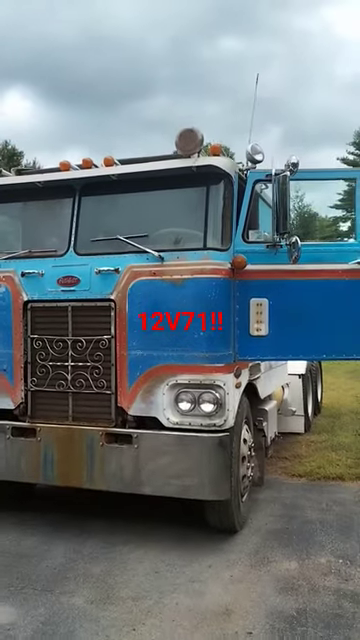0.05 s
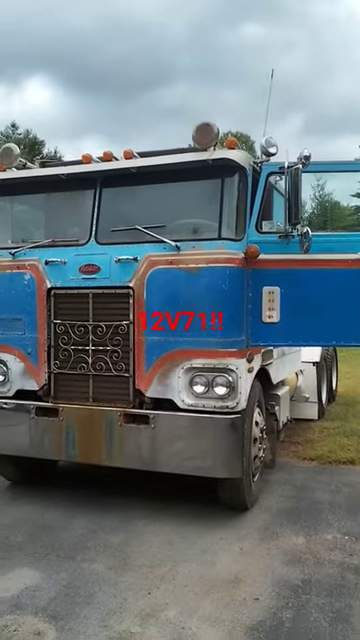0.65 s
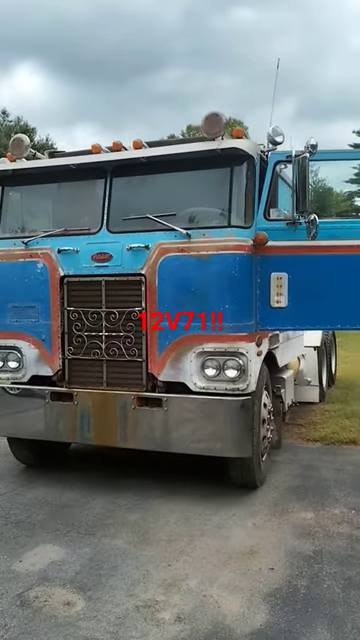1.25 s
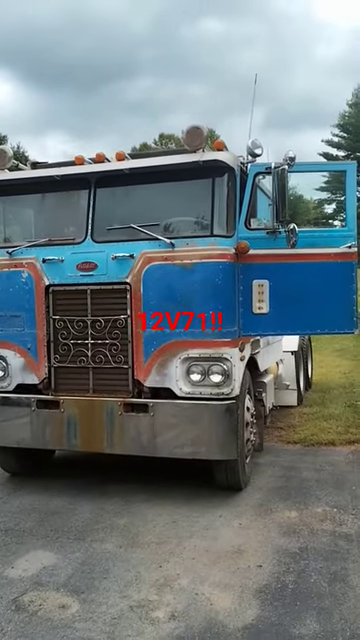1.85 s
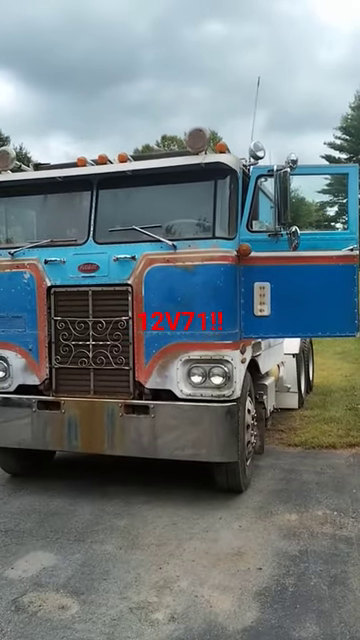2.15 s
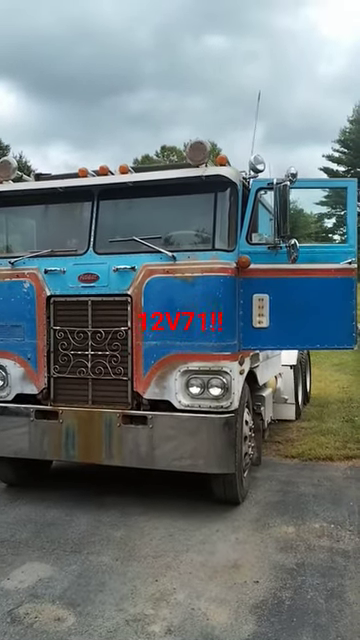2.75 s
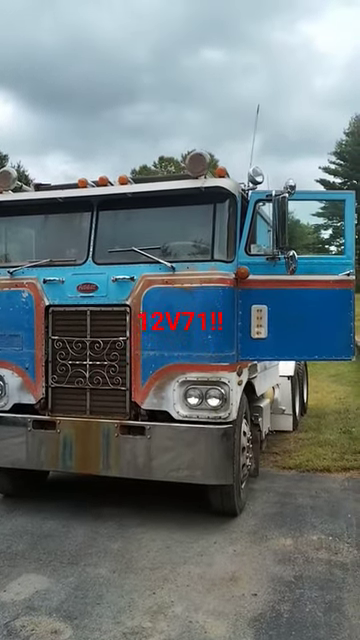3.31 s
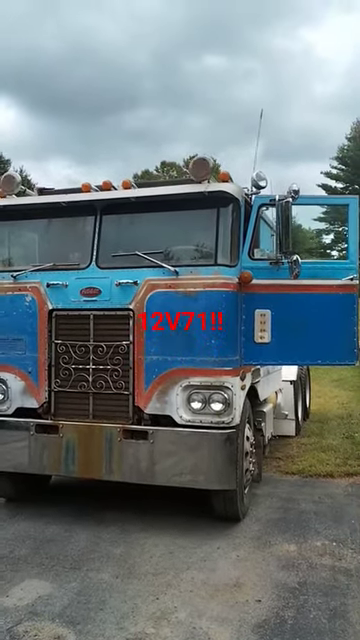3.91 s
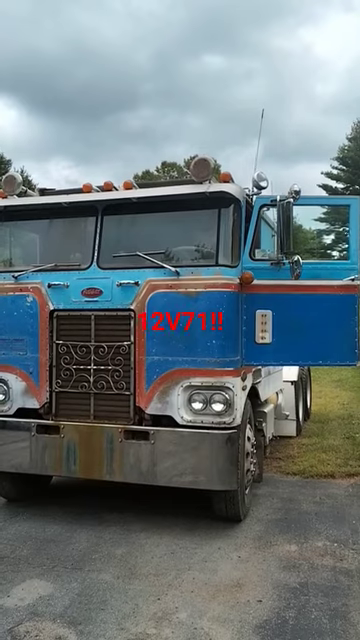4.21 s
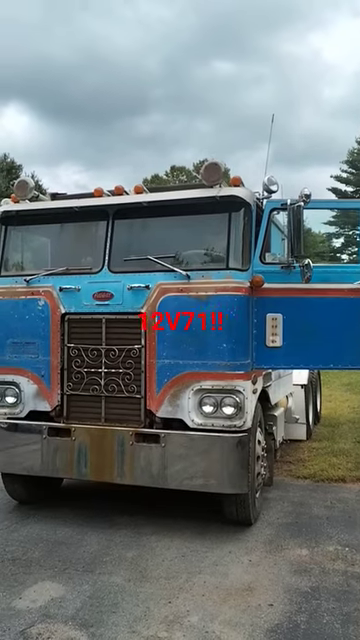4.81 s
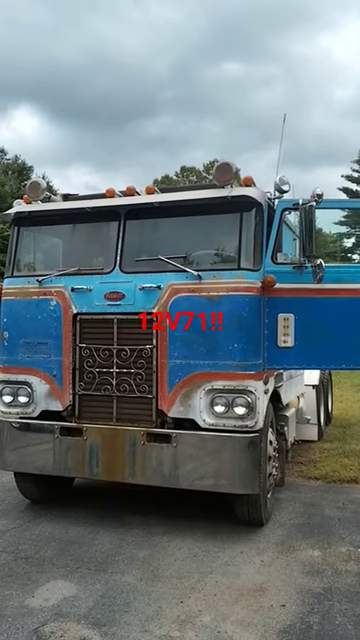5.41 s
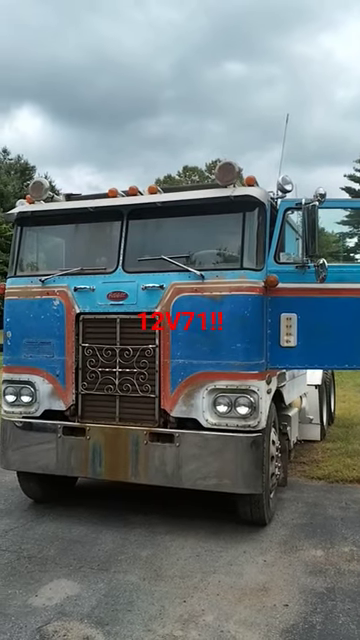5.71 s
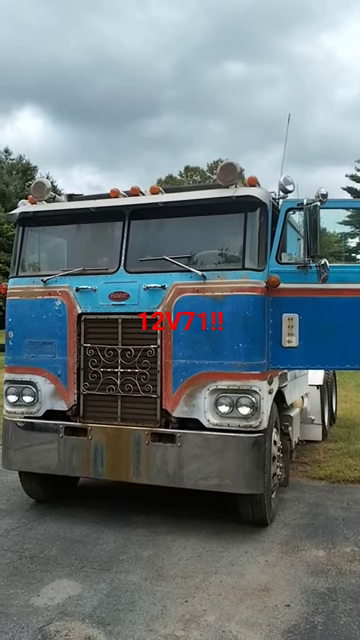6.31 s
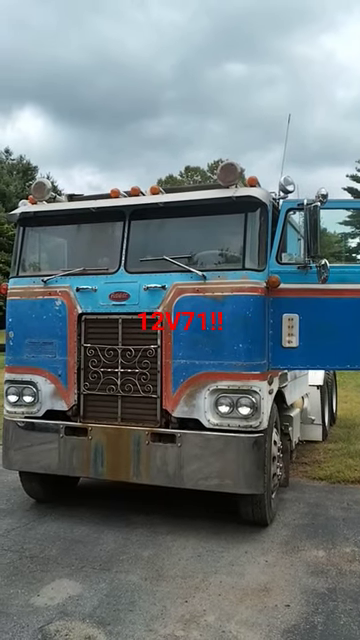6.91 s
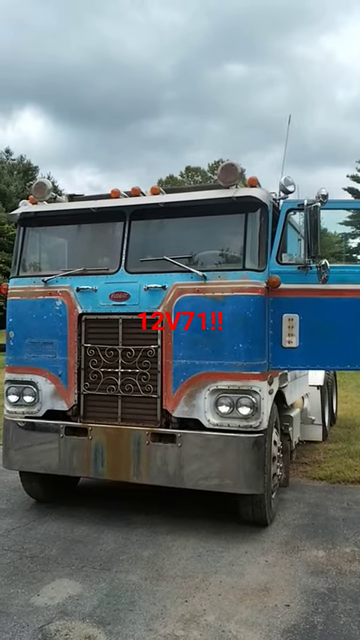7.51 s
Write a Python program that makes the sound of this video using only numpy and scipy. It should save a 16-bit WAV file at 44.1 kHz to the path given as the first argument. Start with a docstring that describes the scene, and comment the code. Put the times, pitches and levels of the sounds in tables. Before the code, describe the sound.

Insects chirp and grit crunches underfoot, then a faint buzzer drones and a diesel truck's starter clanks and cranks without catching.

```python
"""Cold diesel cranking in a country yard

Insects chirp with their wings, grit snaps underfoot and clothing swishes. The key is turned and a buzzer
drones in the cab of an old twelve-cylinder truck. The solenoid clacks, the pinion slams into the
ring gear, and the starter turns the engine over, whining, clattering and chuffing as it gains speed."""
import sys
import numpy as np
from scipy import signal
from scipy.fft import rfft, irfft
from scipy.io import wavfile
from scipy.ndimage import uniform_filter1d

SR = 44100
rng = np.random.default_rng(int(sys.argv[2]) if len(sys.argv) > 2 else 0)


def store_wav(level_fs):
    """Save 16-bit WAV to argv[1]."""
    pcm = np.round(np.clip(np.atleast_2d(level_fs), -1, 1) * 32767)
    wavfile.write(sys.argv[1], SR, pcm.T.astype(np.int16))


N = 332955
T = np.arange(N) / SR
STARTER_ON_S = 6.37
LABOUR_HZ, FREE_HZ, FULL_HZ = 186.84, 235, 259.9  # starter speeds, in gear teeth per second


def undb(db):
    """Decibels to gain."""
    return 10 ** (np.asarray(db) / 20)


def unit(x):
    """Scale to rms 1."""
    return x / np.sqrt(np.mean(x ** 2))


def noise():
    """White noise."""
    return rng.standard_normal(N)


def band(x, hz, width_hz):
    """One resonance, gain 1 at its centre."""
    return signal.lfilter(*signal.iirpeak(min(hz, SR / 2 - 1), hz / width_hz, SR), x)


def colour(x, points):
    """Causal EQ shaped by (Hz, dB) points; white noise keeps its level."""
    hz, db = np.transpose(points)
    log_hz = np.log(np.fft.rfftfreq(4096, 1 / SR) + 1)
    cepstrum = irfft(np.log(undb(np.interp(log_hz, np.log(hz), db))))
    half = len(cepstrum) // 2
    cepstrum[1:half] *= 2
    cepstrum[half + 1:] = 0
    response = irfft(np.exp(rfft(cepstrum)))
    return signal.fftconvolve(x, response / np.linalg.norm(response))[:N]


def drift(rate):
    """Smooth random motion of rms 1, turning rate times a second."""
    k = max(int(SR / rate), 1)
    return unit(uniform_filter1d(np.repeat(noise()[:N // k + 1], k), k)[:N])


def fade(start, decay_s, rise_s=0.00041):
    """Quick attack, exponential decay."""
    age = np.maximum(T - start, 0)
    return np.minimum(age / rise_s, 1) * np.exp(-np.minimum(age / decay_s, 40))


def ramp(start, seconds):
    """Go from off to on."""
    return np.clip((T - start) / seconds, 0, 1)


def ring(x, modes):
    """Strike a set of (Hz, dB, t60) modes; white noise keeps its level."""
    t = T[:SR // 2]
    response = sum(undb(db - 60 * t / t60) * np.sin(2 * np.pi * (hz * t + rng.random()))
                   for hz, db, t60 in modes)
    return signal.fftconvolve(x, response / np.linalg.norm(response))[:N]


def engine(teeth_per_stroke=11, sag=.014, wobble=.013, swell_db=0.9):
    """The starter cranks the engine; each compression slows it and loads the gears."""
    tooth_hz = tooth_rate()
    strokes = np.cumsum(tooth_hz) / SR / teeth_per_stroke
    squeeze = np.cos(2 * np.pi * strokes)
    teeth = np.cumsum(tooth_hz * (1 - sag * squeeze + wobble * drift(30))) / SR
    load = undb(swell_db * squeeze + 0.96 * drift(40))
    # with speed, the chuffing recedes and the whine grows
    speeds = (LABOUR_HZ, FULL_HZ)
    metal = undb(np.interp(tooth_hz, speeds, (-43, -41.5))) * gear_clatter(teeth, load)
    whine = undb(np.interp(tooth_hz, speeds, (-49.5, -44.7))) * starter_whine(teeth, tooth_hz)
    chuff = undb(np.interp(tooth_hz, speeds, (-45, -52.5))) * cylinder_chuff(strokes)
    return ramp(STARTER_ON_S, 0.011) * (metal + whine + chuff)


def tooth_rate(breaks_free_s=6.705, surge_s=.125, creep_s=.45):
    """The starter labours in cold oil, breaks free, then creeps towards full speed."""
    surge = ramp(breaks_free_s, surge_s)
    creep = 1 - np.exp(-np.maximum(T - breaks_free_s - surge_s, 0) / creep_s)
    return LABOUR_HZ + (FREE_HZ - LABOUR_HZ) * surge + (FULL_HZ - FREE_HZ) * creep


def gear_clatter(teeth, load, scatter_db=4, slide_db=-2, housing_db=-4, clatter_db=-1.95, sing_db=-7):
    """Each tooth lands with its own force and slides, ringing the bell housing and the block."""
    # Bell housing modes. Each row: pitch in Hz, width in Hz, relative level in dB.
    housing_modes = [(357, 25, -3), (578, 34, 3.5), (688, 28, 3.5), (723, 26, 3), (988, 25, 2),
                     (1125, 29, -1), (1203, 24, -2.5), (1375, 26, 2), (1606, 84, -1.5), (2192, 37, -3),
                     (2290, 84, -3.5), (2496, 60, -4.5), (2790, 79, -8), (2960, 84, -12)]
    # Tone of the block. Each row: frequency in Hz, relative level in dB.
    block_eq = [(71, -41), (120, -13), (180, -8.5), (243, -7.5), (428, -12.5), (725, -5), (869, -8.5),
                (1000, -8), (2430, -17), (3230, -28), (4550, -17), (6820, -34.5), (7860, -32.5),
                (9620, -55), (15000, -38)]
    impacts = np.diff(np.floor(teeth), prepend=0) * undb(scatter_db * noise())
    sliding = unit(noise() * np.exp(-(teeth % 1) / 2.3))
    mesh = load * (unit(impacts) + undb(slide_db) * sliding)
    housing = sum((-1) ** k * undb(db) * band(mesh, hz, width)
                  for k, (hz, width, db) in enumerate(housing_modes))
    # injectors and timing gears chatter, about 1400 ticks a second
    ticks = (rng.random(N) < 1400 / SR) * noise()
    clatter = colour(load * (sliding + .55 * unit(ticks)), block_eq)
    # worn gears sing in overtones that come and go
    overtones = sum(undb(4.2 * drift(30)) * np.sin(2 * np.pi * k * teeth) for k in range(4, 26))
    sing = colour(overtones, block_eq)
    return undb(housing_db) * unit(housing) + undb(clatter_db) * unit(clatter) + undb(sing_db) * unit(sing)


def starter_whine(teeth, tooth_hz, waver_db=2.5, strain_db=-7):
    """The mesh tone: under strain its fundamental thins and harmonics 2 and 3 come forward."""
    strain = np.clip((245 - tooth_hz) / 60, 0, 1)
    overtones = sum(undb(2.6 * drift(30)) * np.sin(2 * np.pi * k * teeth + .45 * drift(60))
                    for k in (2, 3))
    fundamental = undb(waver_db * drift(14) + strain_db * strain) * np.sin(2 * np.pi * teeth)
    return fundamental + (0.04 + .5 * strain) * overtones


def cylinder_chuff(strokes):
    """Air leaves the cylinders in low, uneven puffs, one per stroke."""
    puffs = np.exp(-(strokes % 1) / .5) * (1 + 30 * noise())
    return unit(band(band(puffs, 56, 33), 53, 70) + 0.5 * band(band(puffs, 95, 16), 95, 60))


def pinion(solenoid_s=6.3155, solenoid_db=-38, ring_db=-9.5, thud_db=-32, thud_hz=93):
    """The solenoid clacks, the pinion bounces into mesh, the ring gear rings and the frame thuds."""
    # Tone of the starter's struck steel. Each row: frequency in Hz, relative level in dB.
    steel_eq = [(59, -18), (100, -2.5), (462, -21), (594, -9.5), (923, -13.5), (1290, -16.5), (1530, -11.5),
                (1960, -18.5), (2270, -5.5), (3180, -20.5), (4730, 1.5), (6620, -26.5), (7200, -23),
                (11000, -38), (15000, -35)]
    # Pinion hits. Each row: start in seconds, level in dB, decay in seconds.
    slams = [(6.356, -40, 0.015), (6.3645, -26.5, 0.012), (6.3681, -11.5, 0.00081),
             (6.3743, -15.5, 0.00099), (6.377, -25.5, 0.013), (6.408, -33.5, 0.022), (6.46, -48, .07)]
    # Ring gear modes. Each row: pitch in Hz, relative level in dB, seconds to fall 60 dB.
    gear_modes = [(4242, -6, .28), (4356, -7, .2), (4408, -4, .28), (4513, -4, .25), (4570, 0, .3),
                  (4684, -6, .2), (4786, -4, .25), (4897, -1, .3), (5048, -3, .28), (5160, -8, .2),
                  (5284, -6, .28), (5470, -10, .2), (5650, -12, .2)]
    clack = colour(noise() * fade(solenoid_s, 0.035, rise_s=0.0018), steel_eq)
    solenoid = 0.46 * clack + band(clack, 2100, 1800) + band(clack, 800, 970) + band(clack, 10000, 5000)
    blows = noise() * sum(undb(db) * fade(s, decay, rise_s=decay / 8) for s, db, decay in slams)
    clang = colour(blows, steel_eq) + undb(ring_db) * ring(blows, gear_modes)
    thud = np.sin(2 * np.pi * thud_hz * (T - STARTER_ON_S))
    thud *= fade(STARTER_ON_S + 0.015, 0.041, rise_s=0.023)
    return undb(solenoid_db) * solenoid + clang + undb(thud_db) * thud


def buzzer(on_s=3.8, pitch_hz=63.75, boost_db=3):
    """A vibrating armature repeats one cycle: a steady warning drone through the open cab door."""
    # Outline of the buzz spectrum. Each row: harmonic number, level in dB before the boost.
    outline = [(2, -72.5), (3, -82.5), (4, -75.5), (5, -77), (6, -73), (8, -104.5), (11, -86), (13, -102),
               (15, -83.5), (17, -105), (21, -88), (29, -97), (32, -89.5), (36, -105), (44, -100),
               (56, -91)]
    turns = np.cumsum(pitch_hz * (1 + 0.0011 * drift(10))) / SR
    harmonics, place = np.arange(2, 57), np.linspace(0, 1, 2049)
    gains = undb(np.interp(harmonics, *np.transpose(outline)) + boost_db)
    cycle = sum(g * np.sin(2 * np.pi * (k * place + rng.random())) for k, g in zip(harmonics, gains))
    return ramp(on_s, 0.1) * np.interp(turns % 1, place, cycle)


def steps_and_key(grit_boost_db=3):
    """Stones snap, shoes scuff on grit, the ignition key scrapes round, and harder contacts knock."""
    # Tone of crushed stone. Each row: frequency in Hz, relative level in dB.
    stone_eq = [(120, -30), (200, -1), (459, -8), (1150, -1), (2380, -4.5), (3290, -6.5), (4310, -1),
                (6770, -12.5), (7830, -15), (8410, -17.5), (15000, -17.5)]
    # Grit under a shoe. Each row: start in seconds, snap and body levels in dB before the boost.
    grit = [(0.0452, -39.5, -52), (0.1274, -42, -70), (0.2788, -37.5, -44.5), (0.2974, -48, -44),
            (0.374, -41, -54), (0.397, -44, -55), (0.4603, -43.5, -62), (0.5204, -43, -70),
            (0.53, -34, -60), (0.621, -62, -48), (0.8913, -35.5, -51), (1.673, -35, -37.5),
            (1.7854, -41, -42), (1.8446, -49, -45.5), (1.8962, -45, -38), (1.9322, -29, -31),
            (1.9747, -37, -65), (2.258, -47.5, -52), (2.306, -53, -55), (2.429, -52, -66)]
    # Shoe scuffs on grit, then from 3.66 s the ignition key turning just before the buzzer starts.
    # Each row: start and length in seconds, level in dB, centre in Hz.
    scuffs_and_key = [(0.198, .13, -65, 2600), (0.462, 0.6, -72, 1510), (1.071, 0.084, -64, 1410),
                      (1.11, 0.06, -63.5, 280), (1.665, 0.14, -62, 2980), (1.891, 0.038, -47, 2600),
                      (3.662, 0.023, -57.5, 4000), (3.68, 0.034, -57.5, 620), (3.756, .075, -65.5, 2400)]
    # Dull knocks. Each row: start in seconds, level in dB, pitch in Hz.
    contacts = [(0.046, -52, 650), (0.205, -53, 650), (0.892, -44, 613), (0.938, -29.5, 617),
                (0.958, -48, 1370), (2.783, -49, 402), (3.185, -50.5, 414), (3.196, -43, 460),
                (5.269, -54, 500), (5.45, -57, 1100), (5.735, -56, 490)]
    stone = colour(noise(), stone_eq)
    snap, body = unit(band(stone, 4470, 1650)), unit(band(stone, 1760, 1250))
    snaps = sum(fade(s, 0.0015, rise_s=0.0014) * (undb(snap_db) * snap + undb(body_db) * body)
                for s, snap_db, body_db in grit)
    friction = colour(noise() * undb(3.8 * drift(700)), stone_eq)
    scrapes = knocks = 0
    for s, length, db, hz in scuffs_and_key:
        gate = ramp(s, 0.0018) * (1 - ramp(s + length, 0.0099))
        scrapes += undb(db) * gate * unit(band(friction, hz, 1.26 * hz))
    for s, db, hz in contacts:
        phase = 2 * np.pi * hz * (T - s)
        tone = np.sin(phase) + 0.3 * np.sin(0.75 * phase) + 0.049 * body
        knocks += undb(db) * fade(s, 0.0034, rise_s=0.00078) * tone
    # the hardest knock scrapes briefly, then cracks
    s, db, _ = max(contacts, key=lambda row: row[1])
    crack = undb(db - 1) * (fade(s, 0.0013) + 0.25 * fade(s - .0035, 0.0054)) * (snap + .5 * body)
    return undb(grit_boost_db) * snaps + scrapes + knocks + crack


def stride(peak_s=1.49, rise_s=.17, fall_s=.11, cloth_db=-57, rumble_db=-53, rumble_hz=22):
    """Clothing swishes as a leg swings, and the moving microphone rumbles."""
    # Tone of brushing cloth. Each row: frequency in Hz, relative level in dB.
    cloth_eq = [(100, -12), (600, -14), (1100, -5), (3400, -3), (5200, 0), (8000, -6), (10000, -15),
                (15000, -14)]
    swing = np.exp(-((T - peak_s) / np.where(T < peak_s, rise_s, fall_s)) ** 2 / 2)
    cloth = unit(colour(noise() * undb(.8 * drift(300) + 1.2 * drift(25)), cloth_eq))
    rumble = unit(band(band(noise(), rumble_hz, 24), rumble_hz, 24))
    return swing * undb(cloth_db) * cloth + swing ** 2 * undb(rumble_db) * rumble


def insects(top_hz=7980, rise_hz=480, fall_hz=1250, rasp_hz=30, onset_s=.013, tail_s=.015,
            octave_db=-27, start_db=-58.5, growth_db_per_s=1.23, full_song_s=5.3):
    """Each wing stroke speeds up and slows, so the chirp arches in pitch; uneven teeth make it rasp."""
    # Runs of chirps. Each row: start and end in seconds, chirps per second, relative level in dB.
    songs = [(0.024, 0.31, 14.8, 0), (1.033, 1.19, 7.04, 1), (1.275, 1.3, 15, 2), (1.486, 2.5, 14.95, 0),
             (2.562, 7.56, 15.083, 0), (0.076, 1.0, 16.4, -8), (1.71, 7.56, 16.25, -11),
             (2.3, 6.4, 14.3, -15)]
    out, t = np.zeros(N + SR), np.arange(-SR // 50, SR // 50) / SR
    envelope = np.cos(np.pi / 2 * np.clip(t / np.where(t < 0, onset_s, tail_s), -1, 1))
    droop_hz = np.where(t < 0, rise_hz, fall_hz) * (t / onset_s) ** 2
    rasp = rasp_hz * np.resize(drift(2500), len(out))
    for start, end, rate, db in songs:
        for s in np.arange(start, end, 1 / rate):
            detune, accent, lag = rng.standard_normal(3)
            i = max(int((s + t[0] + 0.0011 * lag) * SR), 0)
            peak_hz = top_hz + 12 * db + 20 * detune  # quieter runs sit a little lower
            phase = 2 * np.pi * np.cumsum(peak_hz - droop_hz + rasp[i:i + len(t)]) / SR
            chirp = envelope * (np.sin(phase) + undb(octave_db) * np.sin(2 * phase))
            out[i:i + len(t)] += undb(db + .5 * accent) * chirp
    warm_up = undb(start_db + growth_db_per_s * np.minimum(T, full_song_s))
    return out[:N] * warm_up


def yard(air_db=-65, shimmer_db=0.66, trim_db=-1.57, swell_db=.8):
    """A bed of still country air, low hum and far crickets that shimmer, swell and ebb."""
    # Tone of the air. Each row: frequency in Hz, relative level in dB.
    air_eq = [(25, 2), (70, -.5), (125, -4.5), (220, -6), (400, -15.5), (800, -18.5), (1800, -24.5),
              (3300, -26.5), (6300, -24.5), (9000, -30.5), (13000, -32), (15500, -26)]
    # Hum and cricket bands. Each row: centre in Hz, width in Hz, level in dB before the trim.
    chorus_bands = [(121, 13.3, -70), (234.4, 27, -77), (2550, 600, -77.5), (4680, 340, -67.5),
                    (5080, 380, -73.5)]
    air = unit(colour(noise(), air_eq)) * undb(air_db + 0.21 * drift(2.6))
    chorus = 0
    for hz, width, db in chorus_bands:
        gain = undb(db + shimmer_db * drift(8.5))
        chorus += gain * unit(band(band(noise(), hz, 1.36 * width), hz, 1.36 * width))
    return air + chorus * undb(trim_db + swell_db * drift(3.03))


def scene(echo_db=-17, echo_decay_s=0.044):
    """The mono mix; ground and truck body scatter a short echo of the close sounds."""
    near = engine() + pinion() + steps_and_key() + stride()
    tail = (noise() * fade(0.01, echo_decay_s))[:SR // 2]
    echo = signal.fftconvolve(near, tail / np.linalg.norm(tail))[:N]
    return (near + undb(echo_db) * echo + buzzer() + insects() + yard())[None]


def record(dry, top_hz=15600):
    """A steep low-pass takes off the very top."""
    return signal.sosfilt(signal.ellip(12, .2, 70, top_hz, fs=SR, output="sos"), dry)


dry = scene()
out = record(dry)
store_wav(out)
```